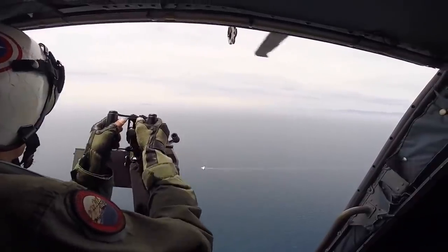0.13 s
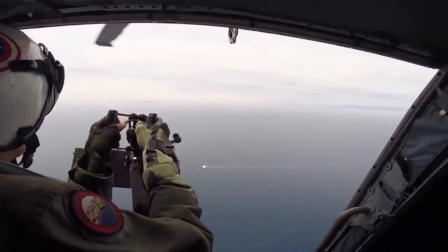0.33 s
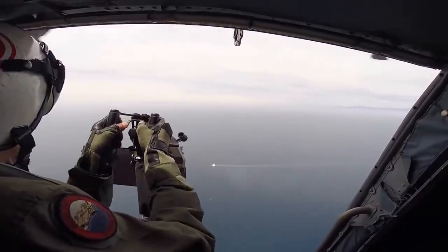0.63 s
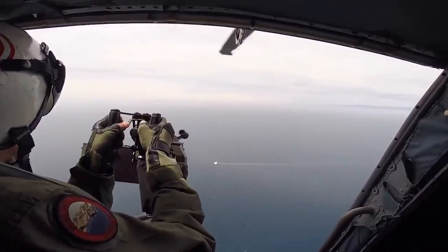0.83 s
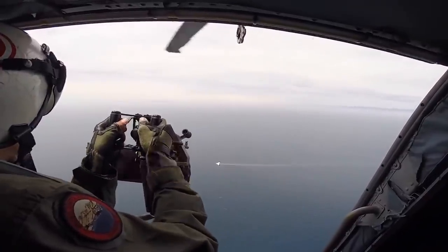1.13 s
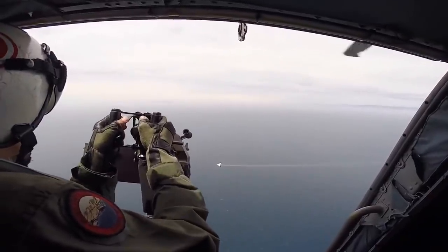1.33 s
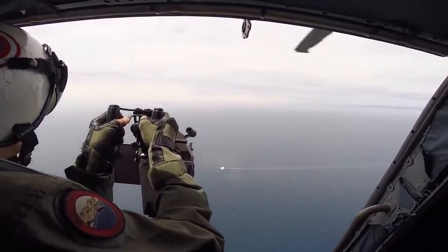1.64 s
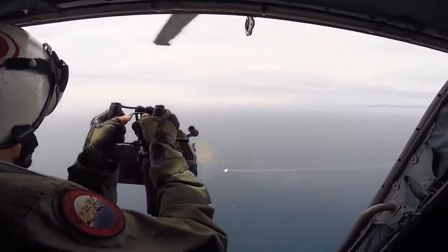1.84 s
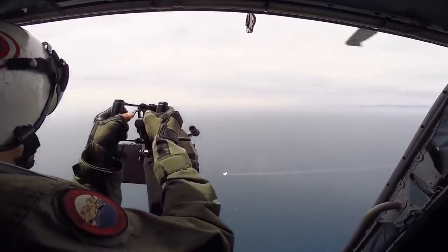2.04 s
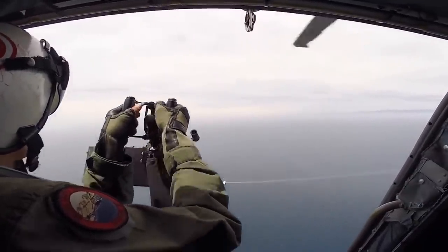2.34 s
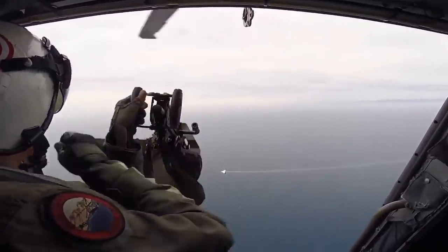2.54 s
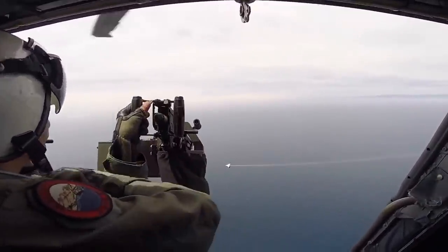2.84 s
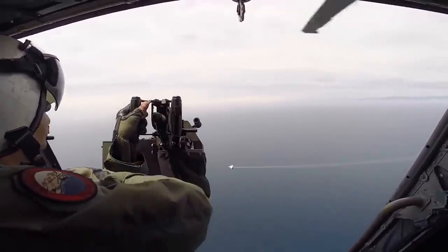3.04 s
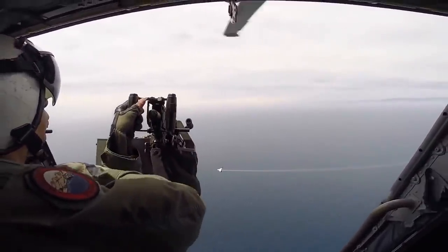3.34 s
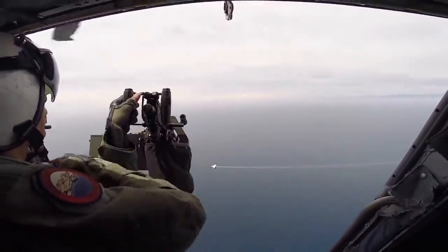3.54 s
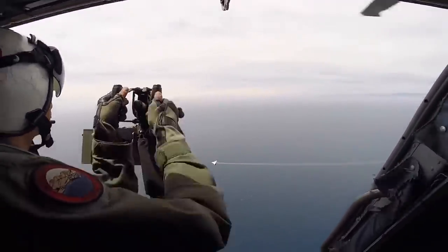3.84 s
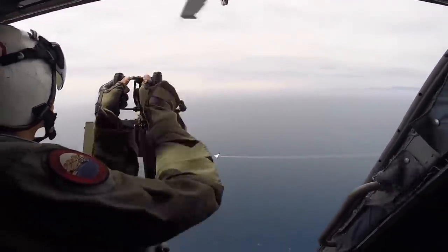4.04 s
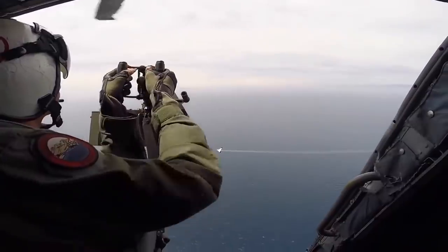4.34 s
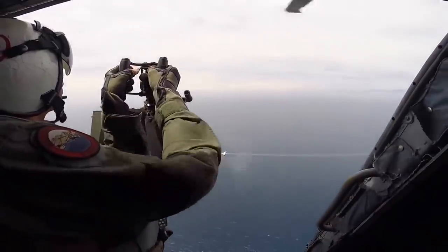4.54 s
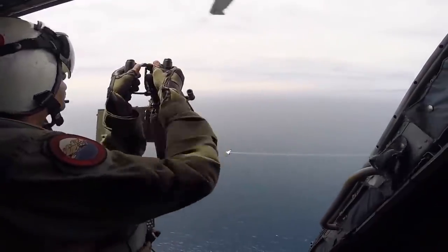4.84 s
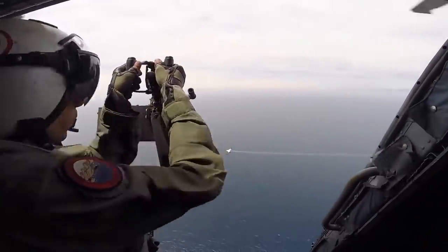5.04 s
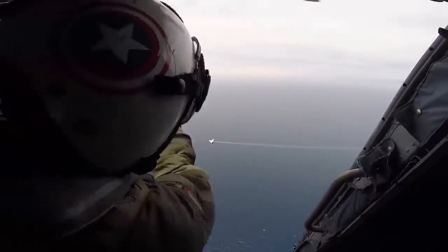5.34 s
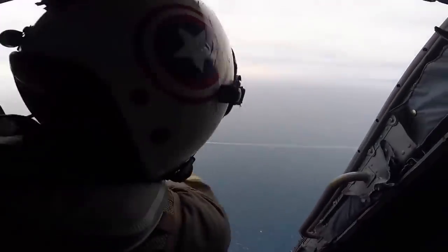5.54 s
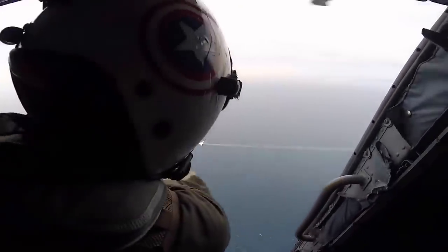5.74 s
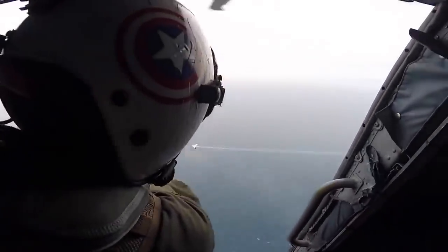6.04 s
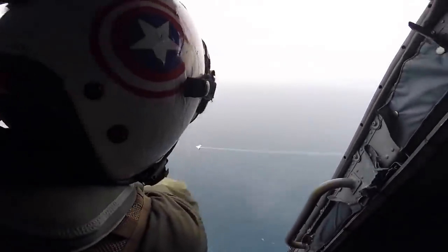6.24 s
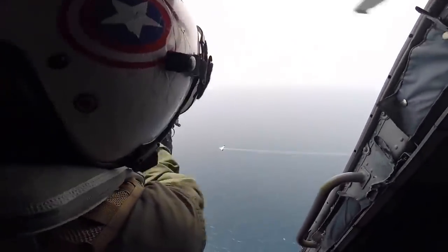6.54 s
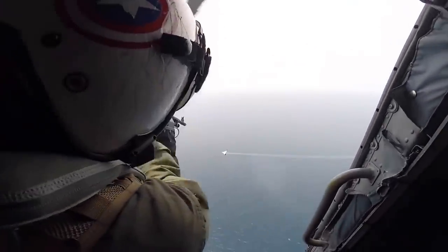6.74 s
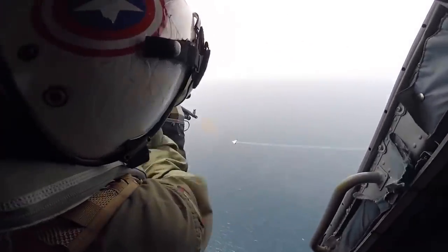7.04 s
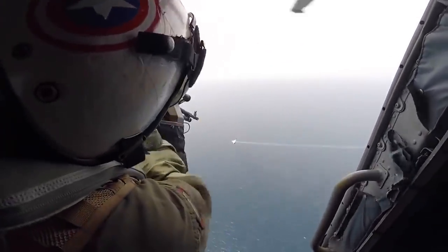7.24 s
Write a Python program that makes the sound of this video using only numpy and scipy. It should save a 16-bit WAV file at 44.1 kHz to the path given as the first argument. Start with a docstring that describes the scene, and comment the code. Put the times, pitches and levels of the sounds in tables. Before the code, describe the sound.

A helicopter cabin with an open door: rushing slipstream, engine roar, low fluttering rotor hum, a steady gear whine around 1 kHz with a higher one near 2 kHz, and a faint very high turbine whistle. It begins subdued. At 0.5 s a heavy machine gun at arm's length fires ten rounds, about thirteen a second, until 1.2 s; another ten run from 1.7 to 2.4 s. Each round is a saturated, thudding crack with clanking steel and a short, hard cabin echo. The overloaded microphone's gain ducks, nearly erasing the helicopter. From 2.5 to 4.6 s its roar and whine swell back, the pitch rising slightly. Three rounds hit at 4.7 s, followed by another swelling pause. Five rounds follow at 6.1-6.4 s, then eight from 6.8 s almost to the end at about 7.4 s.

```python
"""In the open door of a helicopter, a heavy machine gun fires five bursts at arm's length from a microphone.
Filtered noise makes the roar and slipstream; drifting sinusoids make the rotor, gear and turbine tones.
Each round is a dispersed impulse round the door frame, with decaying steel modes and a noise echo in the cabin.
The blasts overload the microphone and its gain control ducks at every shot: the helicopter
vanishes in the bursts and swells back in the pauses."""
import sys
import numpy as np
from scipy.fft import rfft, irfft, next_fast_len
from scipy.io import wavfile
from scipy.ndimage import uniform_filter1d, minimum_filter1d, map_coordinates

SR = 44100
rng = np.random.default_rng(int(sys.argv[2]) if len(sys.argv) > 2 else 0)


def wrap_up_sound(samples):
    """Save the sound to the file named by the first command line argument, as 16-bit audio."""
    columns = np.atleast_2d(samples).T
    # keep every value between -1 and 1, then stretch to whole-number steps
    tamed = np.clip(columns, -1, 1)
    steps = np.round(tamed * 32767).astype(np.int16)
    wavfile.write(sys.argv[1], SR, steps)


N = 325437  # samples


def amp(db):
    """Level definition: decibels to amplitude ratio."""
    return 10 ** (np.asarray(db) / 20)


def unit(x):
    """Power normalisation: scale to rms 1."""
    return x / np.sqrt(np.mean(x ** 2) + 1e-20)


def along(points, hz):
    """Logarithmic pitch scale: (frequency, value) points joined on a log axis."""
    f, v = np.transpose(points)
    return np.interp(np.log(hz + 1), np.log(f + 1), v)


def bell(hz, centre, width):
    """Resonance curve: a Gaussian hump of height 1, width wide at half height."""
    return .5 ** ((2 * (hz - centre) / width) ** 2)


def curve(points):
    """Slow variation: (time, value) points joined linearly, one value per sample."""
    s, v = np.transpose(points)
    return np.interp(np.arange(N) / SR, s, v)


def wobble(rate):
    """Band-limited fluctuation: a smooth curve through random knots, rate of them a second."""
    knots = rng.standard_normal(int(N * rate / SR) + 4)
    return map_coordinates(knots, [np.arange(N) * rate / SR])


def cycle(hz):
    """Phase accumulation: the running integral of a changing frequency, in radians."""
    return 2 * np.pi * np.cumsum(hz) / SR


def tone(hz, unsteady, flutter_rate=22):
    """Partial coherence: a line of rms 1, a share of which drifts at random in strength and phase."""
    share = np.clip(unsteady, 0, 1)
    drift = (wobble(flutter_rate) + 1j * wobble(flutter_rate)) / np.sqrt(2)
    envelope = np.sqrt(1 - share ** 2) + share * drift
    return unit(np.real(envelope * np.exp(1j * cycle(hz))))


# cabin resonances that colour all diffuse sound: (centre [Hz], width [Hz], level [dB])
CABIN = [(233, 136, 2.5), (1490, 380, 4), (2340, 610, 2), (2710, 130, -0.5), (3418, 400, 8),
         (4549, 430, -6.5), (6390, 1500, 5)]


def cabin_noise(spectrum):
    """Room coloration: noise of rms 1 whose spectrum is shaped by the cabin modes."""
    m = next_fast_len(N)
    hz = np.fft.rfftfreq(m, 1 / SR)
    cabin_db = sum(db * bell(hz, f, width) for f, width, db in CABIN)
    colour_db = along(spectrum, hz) + cabin_db
    return unit(irfft(rfft(rng.standard_normal(m)) * amp(colour_db), m)[:N])


# slipstream and engine roar, spectral shape: (frequency [Hz], relative level [dB])
ROAR = [(15, -4), (35, 0), (55, -1.5), (80, 0), (110, -9.5), (150, 0), (280, -5), (450, -8), (900, -11.5),
        (2200, -12), (5000, -16), (7800, -26.5), (11000, -28), (13300, -20.5), (15500, -38)]


def roar(blade, level_db=-23):
    """Broadband flow noise: slipstream and engine, modulated by the blades and by random gusts of level."""
    return amp(level_db + 0.13 * blade + 1.12 * wobble(45)) * cabin_noise(ROAR)


# rotor speed, read as the main gear mesh: (time [s], frequency [Hz])
MESH = [(0, 995), (1.3, 990), (3.15, 988.5), (3.6, 997), (4.25, 1003), (6, 1001), (7.38, 997)]
MESH_HZ = 1002  # mesh frequency at which the rotor and gear tables hold


def main_mesh():
    """Gear kinematics: the mesh frequency follows the rotor speed."""
    return curve(MESH)


# rotor shaft tones: (frequency at MESH_HZ [Hz], level before TONE_LEVEL [dB], unsteady share [0-1])
ROTOR_TONES = [(17.3, -36.5, 0.35), (79.4, -36, 0.2), (163.4, -44, 0.04), (196.7, -40.5, 0.34),
               (240.8, -38, 0.32), (353.4, -34.5, 0.39)]


def blade_beat(speed):
    """Periodic modulation: a sine at the lowest rotor tone."""
    return np.sin(cycle(ROTOR_TONES[0][0] * speed))


def rotor_hum(speed):
    """Rotational noise: low lines locked to the rotor shaft."""
    return sum(amp(db) * tone(hz * speed, unsteady, flutter_rate=12) for hz, db, unsteady in ROTOR_TONES)


# gearbox lines: (frequency at MESH_HZ [Hz], level before TONE_LEVEL and throb [dB], unsteady share [0-1])
GEAR_TONES = [(709, -46, 0.5), (981, -38, 0.61), (1003, -21.5, 0.14), (1039, -51, 0.97), (1120, -42, 0.7),
              (1230, -53, 0.36), (1405, -42.5, 0.25), (1500, -44.5, 0.3), (1965.5, -42.5, 0.994),
              (2006, -35, 0.78), (2813, -50, 0.26), (2977, -43.5, 0.97), (3014, -39.5, 0.64),
              (3975, -45.5, 0.7), (4020, -43.5, 1)]


def gear_whine(speed, blade):
    """Gear meshing: tooth-contact lines locked to the shaft and throbbing with the blades."""
    whine = np.zeros(N)
    for hz, db, unsteady in GEAR_TONES:
        throb_db = 0.66 * unsteady * blade  # the downwash shakes the unsteady lines most
        whine += amp(db + throb_db) * tone(hz * speed, unsteady, flutter_rate=30)
    return whine


def accessory_whine(mesh_hz, blade, level_db=-30, ratio=2.034):
    """Gear ratio: a second mesh and its octave, at a fixed multiple of the main mesh."""
    hz = ratio * mesh_hz + 1.83 * wobble(7)  # the engine hunts slightly
    octave = amp(-13) * tone(2 * hz, unsteady=0.21)
    return amp(level_db + 2.6 * blade) * (tone(hz, unsteady=0.13) + octave)


# turbine effort, read as the compressor blade tone: (time [s], frequency [Hz])
COMPRESSOR = [(0, 13330), (.9, 13030), (2.45, 13260), (3.5, 13670), (4.3, 13640), (7.38, 13340)]


def compressor_whistle(level_db=-38):
    """Blade-passing tone: a high line whose frequency follows the turbine and jitters."""
    return amp(level_db) * tone(curve(COMPRESSOR) + 9 * wobble(48), unsteady=0.6, flutter_rate=39)


# gain on the rotor and gear tones: (time [s], level [dB])
TONE_LEVEL = [(0, -2), (2.6, 0), (3.2, 2), (5.1, 3), (6.7, -3.5), (7.38, -10)]


def helicopter():
    """Superposition: roar, rotor hum, gear whines and whistle, tied to one rotor speed but for the whistle."""
    mesh_hz = main_mesh()
    speed = mesh_hz / MESH_HZ
    blade = blade_beat(speed)
    shaft_tones = amp(curve(TONE_LEVEL)) * (rotor_hum(speed) + gear_whine(speed, blade))
    return roar(blade) + shaft_tones + accessory_whine(mesh_hz, blade) + compressor_whistle()


def add(track, s, sound):
    """Superposition: mix a sound into the track from time s."""
    part = track[round(s * SR):][:len(sound)]
    part += sound[:len(part)]


# trigger pulls: (start [s], rounds, cycle [s], start-up lag [s], belt drag [s per round],
#                 level against an ordinary round [dB], aim [row of DOORWAY])
BURSTS = [(.5242, 10, .06944, .0161, .00067, 0, 0), (1.6855, 10, .07147, .0141, .00068, 0, 0),
          (4.6593, 3, .0774, .0035, 0, 1.5, 1), (6.1073, 5, .0679, .0137, .0031, 0, 2),
          (6.8279, 8, .0712, .007, 0, -2.2, 3)]


def rounds(ordinary_db=27, lag_left=.4, first_db=4.5, first_left=0.21, scatter_db=0.8):
    """Firing rhythm: (s, dB, aim) of rounds that open loud and slow, speed up, then meet belt drag."""
    fired = []
    for s, number, cycle_s, lag_s, drag_s, db, aim in BURSTS:
        for k in range(round(number)):
            opening_db = first_db * first_left ** k
            level_db = ordinary_db + db + opening_db + rng.normal(0, scatter_db)
            fired.append((s, level_db, round(aim)))
            s += cycle_s + lag_s * lag_left ** k + drag_s * k
    return fired


# cabin reverberation and clash of the bolt, spectral shape: (frequency [Hz], relative level [dB])
ECHO = [(30, -6.5), (100, -5), (350, 5.5), (500, 2), (850, -1.5), (1150, 6), (2500, 2.5), (5000, -0.5),
        (7500, -7.5), (11000, -10), (15500, -25)]


def bolt_closing(t, rise_s=0.001):
    """Finite contact time: the bolt's excitation rises exponentially."""
    return 1 - np.exp(-t / rise_s)


def diffuse_sound(fired, t, bolt_s, feed_s=.009, echo_t60=0.092):
    """Energy addition: belt feed, bolt clash and cabin echo sum as decaying powers on one noise."""
    power = np.zeros(N)
    for s, _, _ in fired:
        add(power, s - feed_s, amp(-17.5 - 60 * t / .06) ** 2)
        add(power, s - bolt_s, (bolt_closing(t) * amp(-4 - 60 * t / 0.06)) ** 2)
        add(power, s, amp(6 - 60 * t / echo_t60) ** 2)
    return np.sqrt(power) * cabin_noise(ECHO)


# steel receiver modes before random scatter: (frequency [Hz], level [dB], t60 [s])
RECEIVER = [(1455, -19, 0.096), (2246, -11, 0.16), (3380, -9, 0.127), (3620, -1, 0.066), (5280, -4, 0.057),
            (6400, -8, 0.06)]


def receiver_ring(t):
    """Modal vibration: the bolt excites exponentially decaying modes of the steel."""
    ring = np.zeros(len(t))
    for hz, db, t60 in RECEIVER:
        decay = amp(db + rng.normal(0, 3.02) - 60 * t / t60)
        ring += decay * np.sin(2 * np.pi * hz * rng.normal(1, 0.0082) * t)
    return bolt_closing(t) * ring


# bands the doorway reinforces, a row per aim of the gun: (centre [Hz], width [Hz], relative level [dB])
DOORWAY = [
    [(330, 227, 17), (637, 329, 16), (908, 130, 16.5), (1315, 272, 21.5), (1705, 213, 21),
     (2245, 115, 21.5), (3136, 445, 26), (5180, 140, 19), (5790, 510, 16)],
    [(363, 284, 23.5), (716, 290, 21.5), (1324, 190, 27.5), (1810, 210, 23), (2280, 180, 24),
     (2740, 165, 4.5), (3370, 200, 26), (5200, 920, 15.5), (5900, 640, 17)],
    [(370, 270, 23), (790, 355, 17.5), (1380, 170, 24), (1840, 214, 29), (2266, 77, 24), (2785, 250, 18),
     (3180, 237, 24), (4940, 256, 21), (5870, 420, 18.5)],
    [(370, 216, 19.5), (712, 94, 17.5), (1140, 180, 22), (1800, 166, 23), (2266, 104, 22), (2800, 280, 6),
     (3320, 540, 20.5), (5020, 320, 18), (5835, 610, 19.5)],
]
# bare muzzle blast, spectral shape: (frequency [Hz], relative level [dB])
BLAST = [(25, -20.5), (80, 6.5), (200, 14), (600, 9.5), (1000, 0), (2500, 12.5), (4000, 13), (6500, 7.5),
         (8000, 3.5), (12000, -2.5), (15500, -10)]


def blast(lateness, aim, spread_s=0.0032, length_s=0.0049, crest_db=7.5, crack_db=-3, crack_hz=3000,
          patchy_db=3.5, count=48, size=2048):
    """Dispersion: the wave rings the doorway and each band arrives up to spread_s after the direct crack."""
    hz = np.fft.rfftfreq(size, 1 / SR)
    treble = 1 - 1 / (1 + (hz / crack_hz) ** 4)
    doorway_power = sum(amp(db) ** 2 * bell(hz, f, width) for f, width, db in DOORWAY[aim])
    colour = np.sqrt(amp(along(BLAST, hz)) ** 2 + doorway_power)
    patches = np.interp(hz, np.linspace(0, SR / 2, count), rng.standard_normal(count))
    colour = colour * amp(patchy_db * treble ** 2 * patches)  # no two cracks are alike
    # minimum phase from the cepstrum: nothing rings before it is struck
    cepstrum = irfft(np.log(colour))
    ringing = np.imag(rfft(2 * cepstrum[:size // 2], size))
    # the phase is the integral of the group delay
    delay_s = spread_s * np.interp(hz, np.linspace(0, SR / 2, len(lateness)), np.clip(lateness, 0, 1))
    travel = 2 * np.pi * np.cumsum(delay_s) * SR / size
    direct = amp(crack_db) * treble
    arrivals = (direct + np.exp(-1j * travel)) / np.sqrt(1 + direct ** 2)
    wave = irfft(colour * np.exp(1j * ringing) * arrivals)[:size // 2]
    # fixed energy: rms -crest_db if spread over length_s
    return amp(-crest_db) * wave * np.sqrt(length_s * SR / np.sum(wave ** 2))


def gun(count=36, change=0.14, bolt_s=.003):
    """Event sequence: in each round the belt feeds, the bolt slams home, the muzzle blasts, the cabin rings."""
    shots = np.zeros(N)
    t = np.arange(SR // 4) / SR
    fired = rounds()
    paths = rng.random((len(DOORWAY), count))  # shared by all rounds at one aim, before small changes
    paths[:, 0] = 0  # the low push comes nearly straight from the muzzle
    for s, db, aim in fired:
        lateness = paths[aim] + change * rng.standard_normal(count)
        add(shots, s, amp(db) * blast(lateness, aim))
        add(shots, s - bolt_s, receiver_ring(t))
    return shots + diffuse_sound(fired, t, bolt_s)


def scene():
    """Superposition: helicopter and gun at the microphone."""
    return (helicopter() + gun())[None]


def release(cut_db, db_per_s, start_db):
    """Peak holding: a gain cut that follows every rise at once and lets go at a steady rate."""
    ramp = db_per_s * np.arange(N) / SR
    return np.maximum.accumulate(np.maximum(cut_db + ramp, start_db)) - ramp


def gain_control(x, ceiling_db=-5.5, ahead_s=0.003, hold_s=0.051, slow_below_db=9, knee_db=3.5):
    """Look-ahead limiting: part of each cut lets go quickly, the rest over more than a second."""
    over_db = 20 * np.log10(np.abs(x) + 1e-6) - ceiling_db
    ahead, span = int(ahead_s * SR), int((ahead_s + hold_s) * SR)
    padded = np.pad(over_db, (span, span), mode="edge")
    held_db = -minimum_filter1d(-padded, span)[span // 2 + ahead:][:N]  # running maximum
    quick_db = release(held_db, db_per_s=153.5, start_db=28)
    slow_db = release(held_db - slow_below_db, db_per_s=14.5, start_db=20.0)
    cut_db = knee_db * np.logaddexp(0, np.maximum(quick_db, slow_db) / knee_db)  # soft knee
    return x * uniform_filter1d(amp(-cut_db), size=64)


def record(dry, overload_db=24.0, hardness=3, dull_hz=11500, top_hz=15600):
    """Saturation and band limiting: the microphone overloads, the gain ducks, treble softens, the top is cut."""
    squashed = dry[0] / (1 + np.abs(dry[0] / amp(overload_db)) ** hardness) ** (1 / hardness)
    m = next_fast_len(N + SR // 2)
    hz = np.fft.rfftfreq(m, 1 / SR)
    treble = 1 / np.sqrt(1 + (hz / dull_hz) ** 4)
    low_pass = 1 / (1 + (hz / top_hz) ** 80)
    return irfft(rfft(gain_control(squashed), m) * treble * low_pass, m)[None, :N]


dry = scene()
out = record(dry)
wrap_up_sound(out)
```